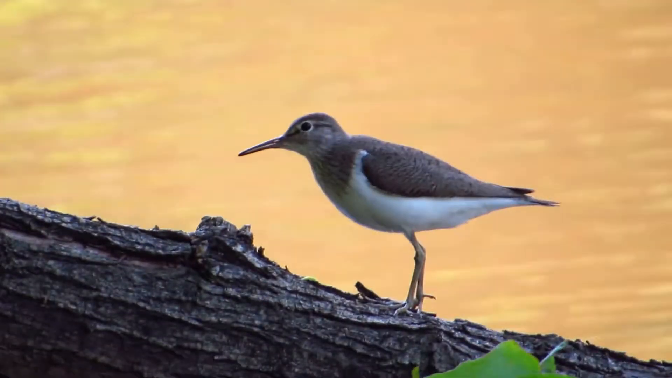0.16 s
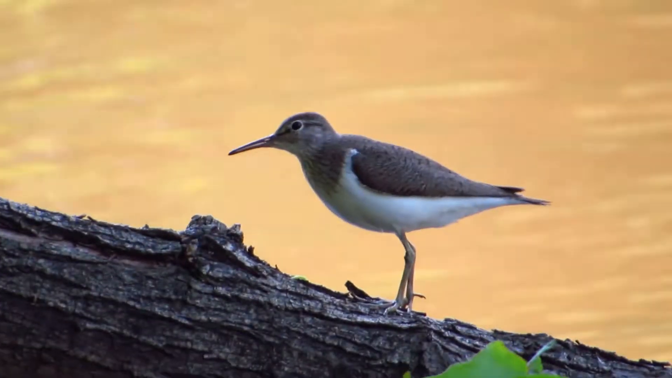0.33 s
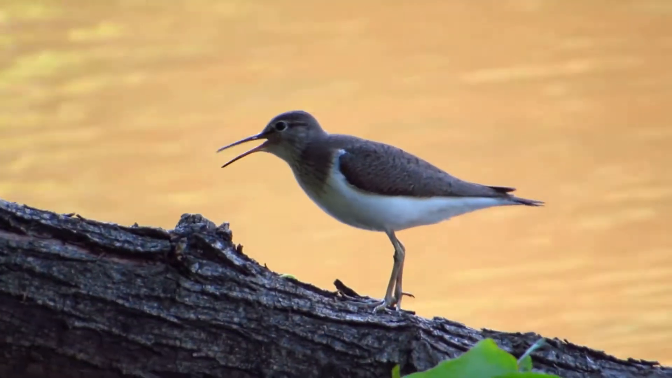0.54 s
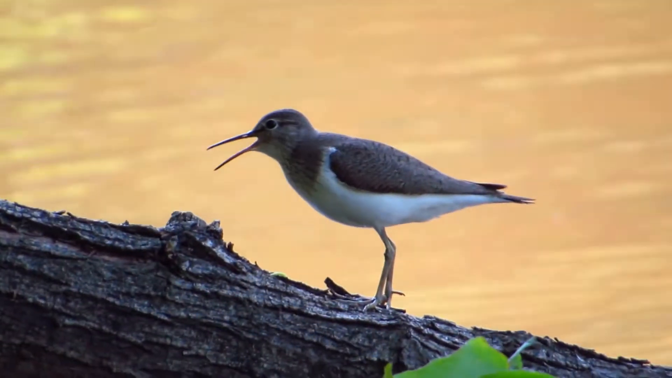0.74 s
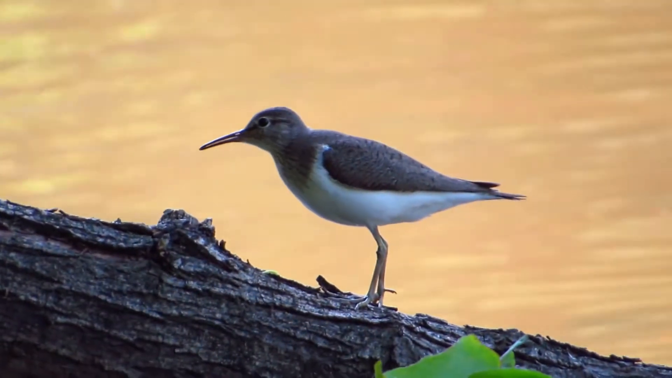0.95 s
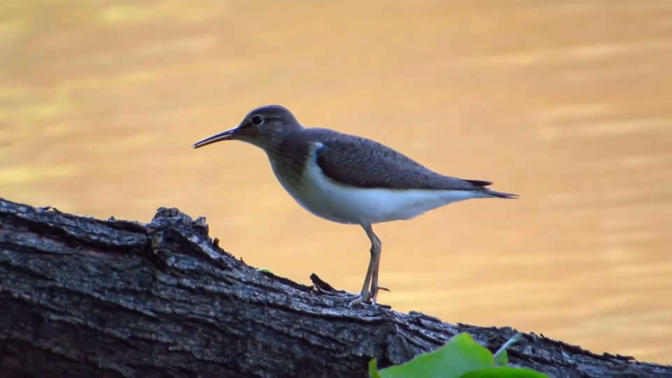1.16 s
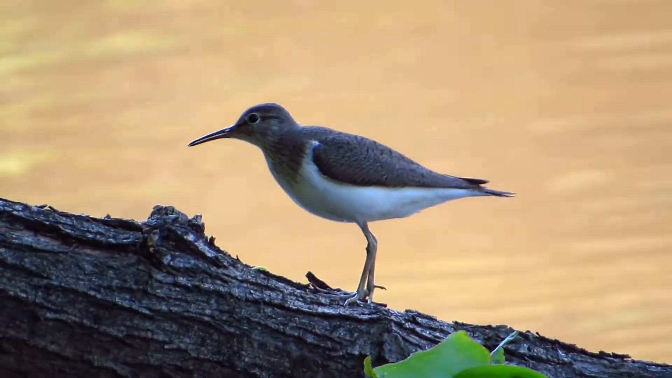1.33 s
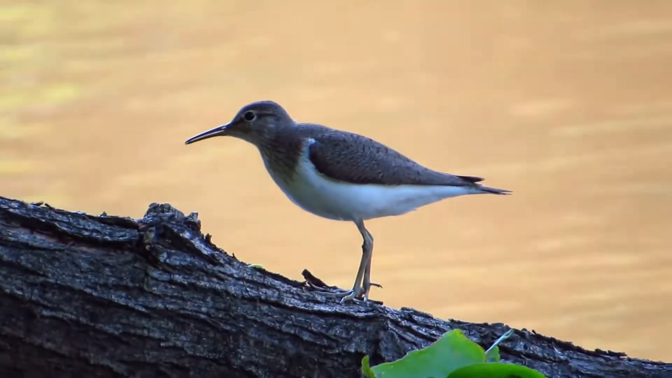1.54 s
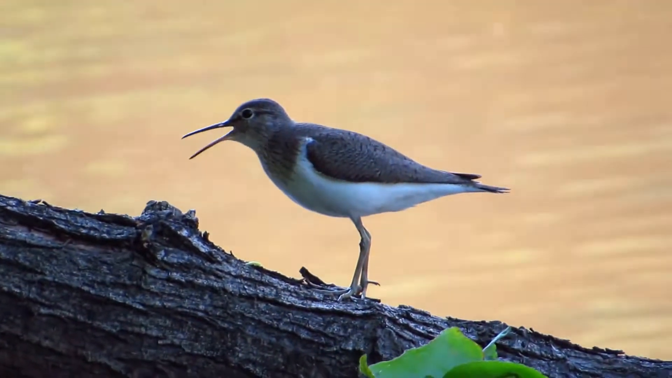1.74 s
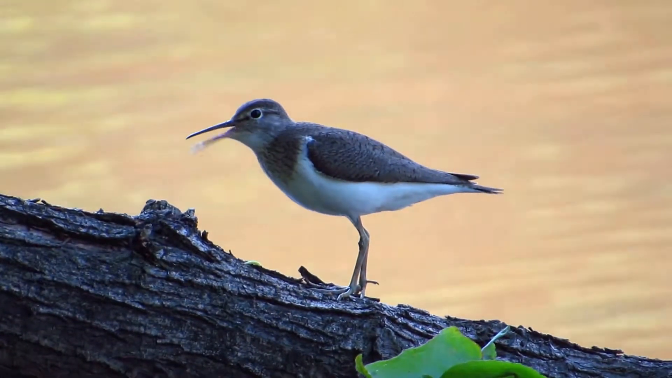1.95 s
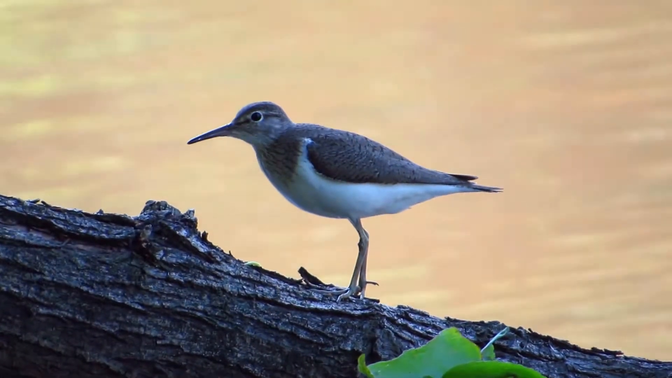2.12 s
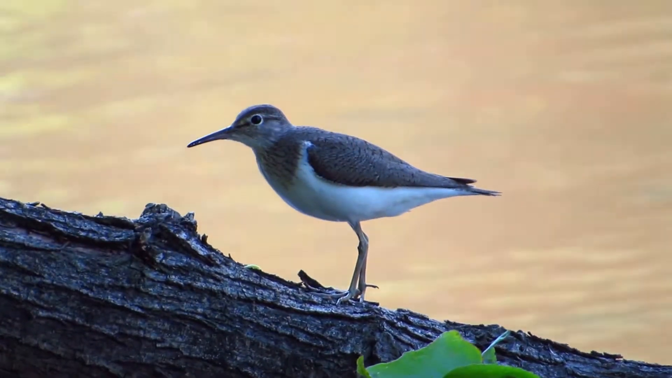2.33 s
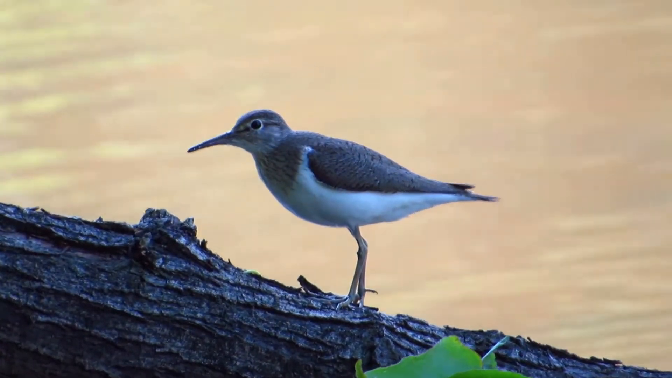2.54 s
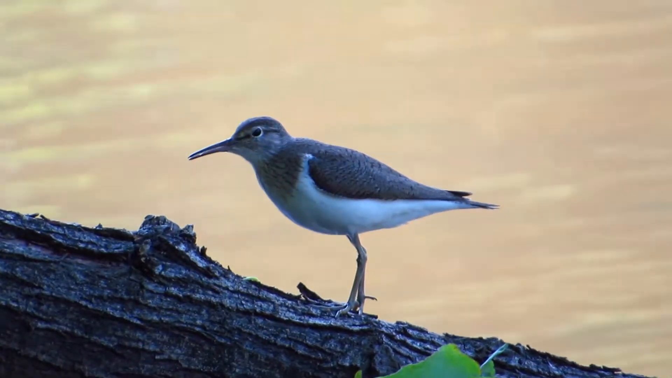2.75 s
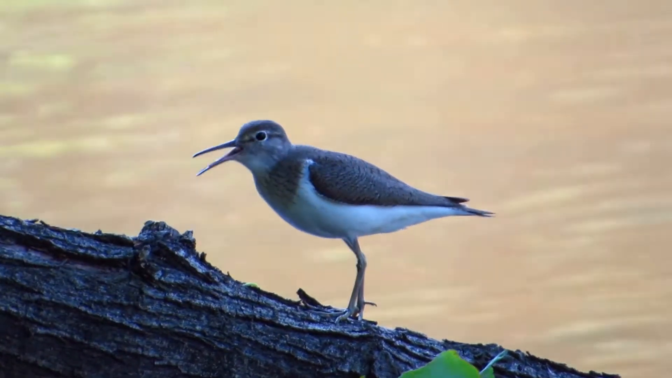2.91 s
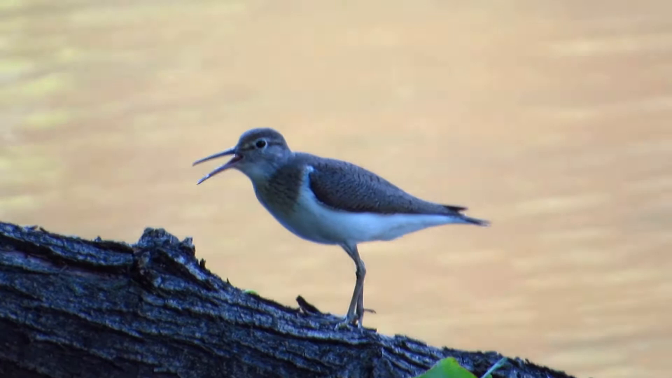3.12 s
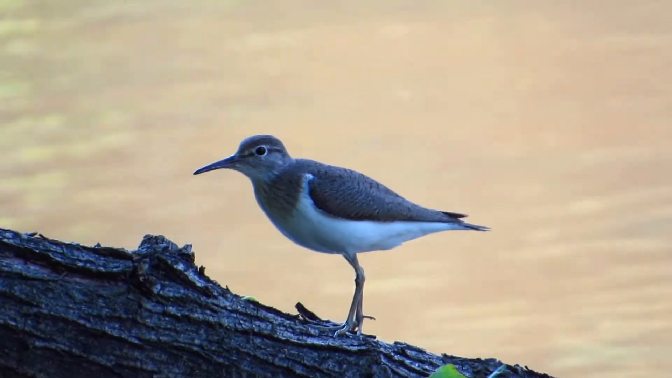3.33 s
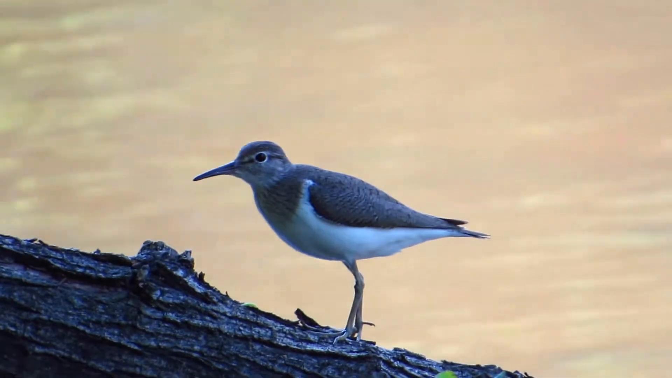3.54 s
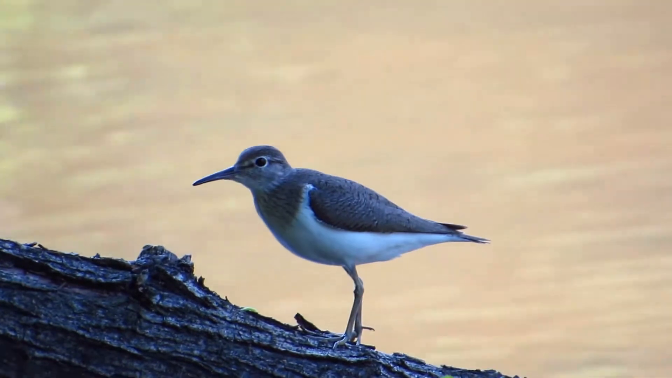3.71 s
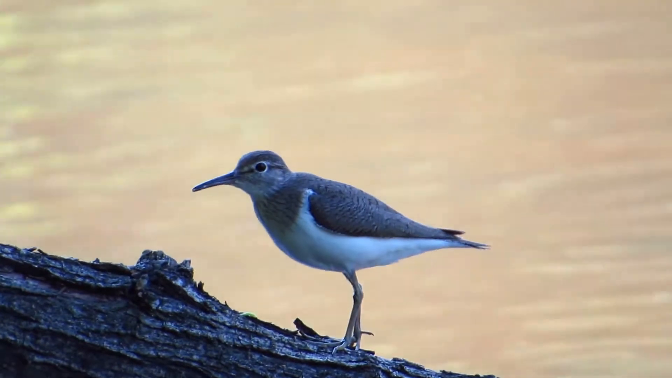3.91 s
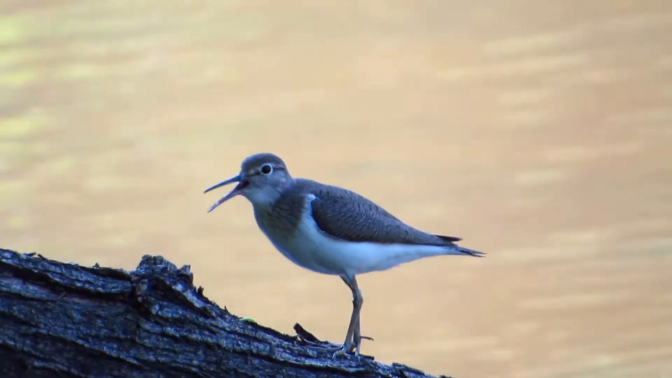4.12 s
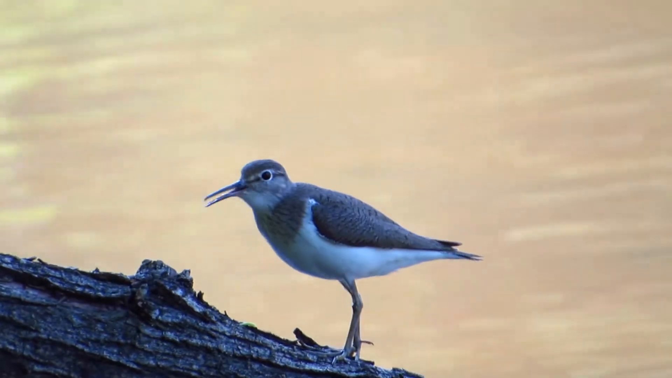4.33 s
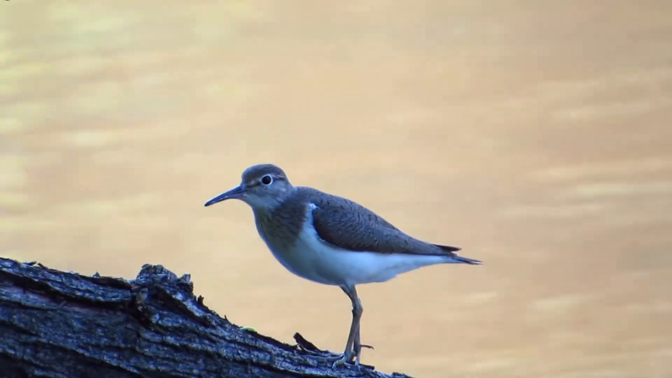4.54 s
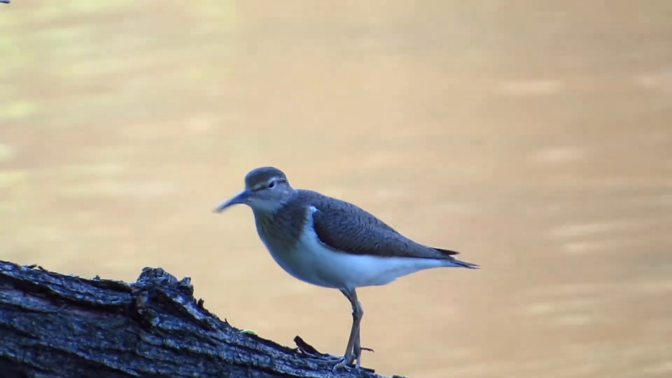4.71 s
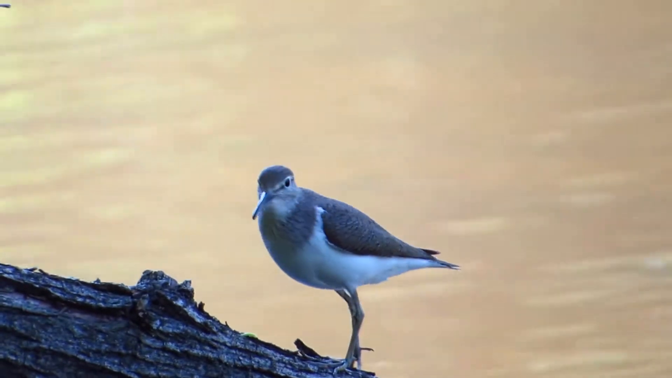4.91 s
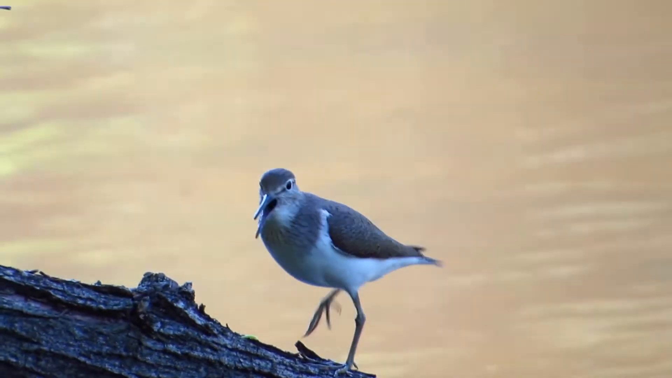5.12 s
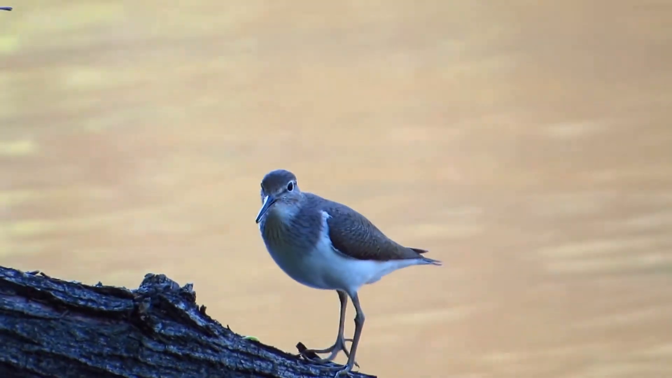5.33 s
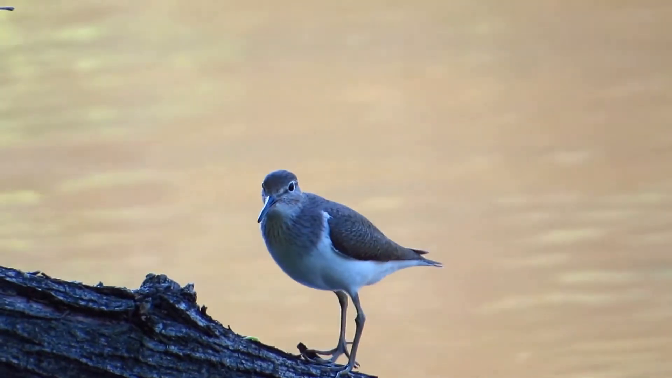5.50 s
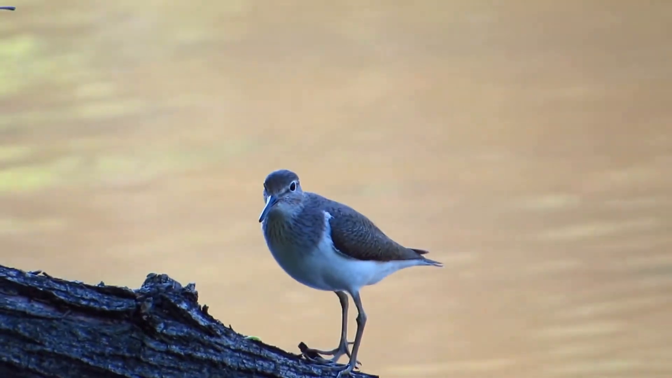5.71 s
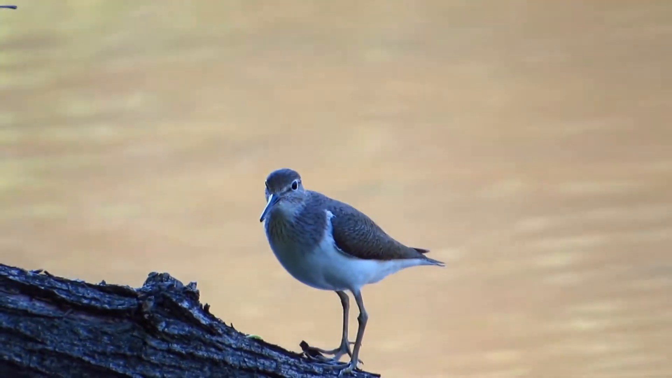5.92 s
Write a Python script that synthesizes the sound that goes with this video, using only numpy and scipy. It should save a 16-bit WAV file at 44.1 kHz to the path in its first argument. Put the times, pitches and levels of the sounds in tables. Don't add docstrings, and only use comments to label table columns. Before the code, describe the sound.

A sandpiper repeats piercing, near-pure rising whistles about once a second, ringing off riverbank trees over faint distant birdsong and low water haze.

```python
import sys
import numpy as np
from scipy import signal
from scipy.fft import rfft, irfft
from scipy.io import wavfile
from scipy.ndimage import uniform_filter1d

SR = 44100
rng = np.random.default_rng(int(sys.argv[2]) if len(sys.argv) > 2 else 0)


def unload_audio(sound):
    columns = np.transpose(np.atleast_2d(sound))
    steps = np.round(np.clip(columns, -1, 1) * 32767)
    wavfile.write(sys.argv[1], SR, steps.astype(np.int16))


def gain_from_db(level_db):
    decades = np.asarray(level_db, float) / 20
    return 10 ** decades


N = 267246

# start in seconds, length in seconds, held effort in dB,
# settled pitch in Hz, overtone offset in dB.
WHISTLES = [
    (-.55, .35, -24, 4740, 0),
    (0.505, .359, -25.5, 4735, 1),
    (1.645, .336, -22.5, 4745, 2),
    (2.813, .357, -20, 4705, -1),
    (4.0, .349, -20.5, 4705, -1),
    (4.991, .312, -20, 4715, 2),
]
# middle in seconds, half width in seconds, change in dB.
FALTERS = [
    (.62, .006, -9),
    (.835, .012, -4),
    (1.743, .006, -8),
    (1.825, .015, -3),
    (2.92, .04, -6),
    (5.025, .015, -9),
    (5.165, .014, -10),
]
# time in seconds, pitch in Hz, level in dB.
TWIG_SNAPS = [
    (0.311, 10650, -69),
    (1.035, 8100, -55),
    (1.449, 9360, -61),
    (1.725, 9040, -68),
    (5.863, 12500, -53.5),
]

# start in seconds,
# length in seconds, start pitch in Hz, end pitch in Hz, level in dB.
WARBLER_FLICKS = [(.11, .05, 4700, 4400, -64), (.375, .06, 5000, 4150, -62), (.425, .035, 6500, 5400, -60),
                  (.76, .04, 4600, 4150, -60), (1.06, .07, 6600, 4150, -59), (1.42, .05, 6400, 4700, -56),
                  (1.77, .08, 3700, 3350, -52), (2.1, .08, 7000, 3400, -52),
                  (2.445, .05, 6900, 4300, -59.5), (2.785, .045, 6900, 5400, -54),
                  (3.095, .04, 6800, 4200, -55), (3.452, .06, 6700, 4650, -53),
                  (5.305, .025, 7500, 6560, -58)]
THRUSH_NOTES = [(.25, .088, 1750, 1750, -58.5), (.355, .095, 2200, 1900, -57), (.71, .04, 2200, 2350, -56),
                (.765, .078, 1900, 2296, -53), (.8, .08, 1780, 1780, -59), (.87, .073, 2300, 2000, -54),
                (.92, .1, 3120, 2940, -56), (1.02, .06, 3000, 2700, -56), (1.57, .053, 2100, 1950, -49),
                (1.765, .2, 2020, 1965, -50), (.96, .18, 2250, 2150, -57), (5.56, .065, 2070, 2060, -56.5),
                (5.64, .02, 2400, 2150, -51), (5.72, .084, 2060, 2055, -48), (5.82, .18, 4140, 4500, -62),
                (6.03, .06, 1756, 1650, -58)]
ALARM_NOTES = [
    (1.74, .49, 9310, 7950, -57.5),
    (5.67, .38, 9090, 8030, -52),
]
WATER_PLOPS = [
    (2.955, .025, 730, 743, -45),
    (3.04, .029, 712, 720, -50),
    (3.04, .018, 855, 866, -48.5),
]

# start in seconds, level in dB.
CHIP_SHAPE = (.045, 5300, 4150, -10)
CHIP_TIMES = [(1.39, -55), (1.495, -52), (1.6, -54), (2.04, -52), (2.145, -53), (2.245, -53), (2.335, -54),
              (2.44, -54), (2.54, -60), (2.645, -54), (2.745, -56)]
LEVEL_SHAPE = (.09, 3780, 3370, 0)
LEVEL_TIMES = [(2.36, -48), (2.455, -47.5), (2.555, -50.5), (2.655, -50), (2.76, -50.5), (4.22, -53)]
FALL_SHAPE = (.055, 3750, 2480, -4)
FALL_TIMES = [(2.84, -47), (2.93, -48), (3.0, -47.5), (3.09, -49), (3.175, -45.5), (3.36, -46.5),
              (4.31, -50), (5.92, -53)]
DROP_SHAPE = (.055, 2550, 1900, -3)
DROP_TIMES = [(3.42, -49.5), (4.35, -52)]
RISE_SHAPE = (.066, 1880, 3350, -4)
RISE_TIMES = [(3.595, -49), (3.74, -49), (3.885, -50.5)]

# middle in seconds, half width in seconds, level in dB.
CHORUS_WAVES = [
    (2.8, .75, -56),
    (5.0, .7, -62),
]
# frequency in Hz, density in dB per Hz.
HAZE_SPECTRUM = [(15, -27), (25, -13), (65, 3.5), (130, -7.5), (300, -2), (560, -4.5), (700, 0.5),
                 (900, -1.5), (1100, -7.5), (1600, -10.5), (2600, -13.5), (5200, -16.5), (13600, -33.5),
                 (15300, -56)]
# frequency in Hz, correlation from -1 to 1.
HAZE_LIKENESS = [(60, 0), (130, -0.9), (290, -0.57), (640, 0.01), (1400, 0.12), (3080, 0.6), (6770, 0.2),
                 (14900, -0.1)]
# frequency in Hz, left minus right in dB.
HAZE_BALANCE = [(60, 1), (130, 0.5), (290, -0.5), (640, -3.5), (1400, 0), (3080, 2), (6770, 0),
                (14900, 0.5)]
# frequency in Hz, width in Hz, depth in dB.
MOTOR_NOTCHES = [(3960, 130, -13), (7940, 110, -11)]

SWOOP_BELOW_HZ, SETTLE_S, CLIMB_HZ_PER_S = 540, .052, 200
SOFT_DB, OPEN_S, SWELL_DB, SWELL_S, PUSH_DB, PUSH_S = -11, .012, -19, .09, 3, .015
SECOND_DB, THIRD_DB = -24, -30
LOW_PAN_DB, HELD_PAN_DB, SWAY_DB = -7, 1, 1.8
LEAVES_DB, LEAVES_HZ = 3, 70
BILL_HZ, BILL_DB = 8500, -37
FLICK_PAN_DB, ALARM_PAN_DB, PLOP_PAN_DB = 2, -1.5, -15
HAZE_DB, HUSH_DB, HUSH_S = -47, -5, .4


def sandpiper():
    out = np.zeros((2, N + SR))
    leaves = gain_from_db(LEAVES_DB * np.array([wobble(2 * SR, LEAVES_HZ) for _ in range(2)]))
    for row in WHISTLES:
        s, sound, sideways = whistle(*row)
        back = echoes(sideways, -14, .4, -14, .9)
        add(out, s, sound)
        add(out, s, (.9 * back + .35 * back[::-1]) * leaves[:, :back.shape[1]])
    return out


def whistle(s, length_s, held_db, top_hz, bright_db):
    t = np.arange(0, length_s + .005, 1 / SR)
    left_s = t[-1] - t
    low = np.exp(-t / SETTLE_S)
    hz = top_hz - SWOOP_BELOW_HZ * low + CLIMB_HZ_PER_S * t - 350 * np.exp(-left_s / .0035)
    phase = 2 * np.pi * np.cumsum(hz + 4 * wobble(len(t), 150)) / SR
    phase = phase - np.array([[0], [.5]])

    flicker_db = (.8 + 2.5 * np.exp(-t / .1)) * wobble(len(t), 120)
    tone = np.sin(phase) * gain_from_db(flicker_db)

    beams_db = 3.5 * np.array([wobble(len(t), 110) for _ in range(4)]) - 25 * np.exp(-left_s / .004)
    second_db = SECOND_DB + bright_db + 6 * (t / length_s - .6) + beams_db[:2] + [[-1.5], [1.5]]
    third_db = THIRD_DB + bright_db - 8 * (t / length_s - .5) + beams_db[2:] + [[1.5], [-1.5]]
    tone += gain_from_db(second_db) * np.sin(2 * phase)
    tone += gain_from_db(third_db) * np.sin(3 * phase[0] - [[0], [1.4]])

    edges = np.minimum(t / .004, 1) * np.minimum(left_s / .007, 1)
    effort_db = held_db + SOFT_DB * np.exp(-t / OPEN_S) + SWELL_DB * np.exp(-t / SWELL_S)
    effort_db += PUSH_DB * np.exp(-left_s / PUSH_S)
    effort_db += sum(db * np.exp(-((s + t - at) / half) ** 2) for at, half, db in FALTERS)
    pan_db = HELD_PAN_DB + (LOW_PAN_DB - HELD_PAN_DB) * low + SWAY_DB * wobble(len(t), 40)
    sound = panned(np.sqrt(2) * gain_from_db(effort_db) * edges * tone, pan_db)

    sideways_db = 7 * np.exp(-t / .1) + 7 * np.exp(-left_s / .006)
    return s, sound, sound * gain_from_db(sideways_db)


def snaps():
    out = np.zeros((2, N + SR))
    t = np.arange(200) / SR
    bill = [(s + length_s, BILL_HZ, db + BILL_DB) for s, length_s, db, *_ in WHISTLES]
    for s, hz, db in [*TWIG_SNAPS, *bill]:
        puff = uniform_filter1d(rng.standard_normal((2, len(t))), size=5)
        add(out, s, gain_from_db(db + 17.5) * puff * np.exp(-t / .0012) * np.sin(2 * np.pi * hz * t))
    return out


def far_sources():
    direct, thrown = np.zeros((2, 2, N + SR))
    finch = sung(CHIP_SHAPE, CHIP_TIMES) + sung(FALL_SHAPE, FALL_TIMES) + sung(DROP_SHAPE, DROP_TIMES)
    # notes, settling share, buzz in Hz, soft-edge share, direct level in dB.
    voices = [
        (finch, 1.2, 260, .3, -11),
        (sung(LEVEL_SHAPE, LEVEL_TIMES), .2, 90, .3, -5),
        (placed(WARBLER_FLICKS, FLICK_PAN_DB), .18, 30, .2, -1),
        (placed(THRUSH_NOTES, 0), .8, 20, .6, -5),
        (sung(RISE_SHAPE, RISE_TIMES), .7, 45, .15, -4),
        (placed(ALARM_NOTES, ALARM_PAN_DB), .24, 25, .5, 1.5),
        (placed(WATER_PLOPS, PLOP_PAN_DB), .8, 5, .7, 3),
        (chorus_notes(), .7, 60, .6, -5),
    ]
    for rows, *voice, direct_db in voices:
        for row in rows:
            s, sound = note(*row, *voice)
            add(direct, s, gain_from_db(direct_db) * sound)
            add(thrown, s, sound)
    back = echoes(thrown, -2, .35, -6.5, 1.2)[:, :N + SR]
    return direct + back + .3 * back[::-1]


def note(s, length_s, start_hz, end_hz, db, pan_db, settle, buzz_hz, edge):
    t = np.arange(0, length_s, 1 / SR)
    glide = np.exp(-t / (settle * length_s))
    glide = (glide - glide[-1]) / (1 - glide[-1])
    hz = end_hz + (start_hz - end_hz) * glide + buzz_hz * wobble(len(t), 300)
    shape = signal.windows.tukey(len(t), np.clip(edge, 0, 1))
    tone = np.sin(2 * np.pi * np.cumsum(hz) / SR)
    return s, panned(np.sqrt(2) * gain_from_db(db) * shape * tone, np.array(pan_db))


def sung(shape, rows):
    length_s, start_hz, end_hz, pan_db = shape
    return [(s, length_s, start_hz, end_hz, db, pan_db) for s, db in rows]


def placed(rows, pan_db):
    return [(*row, pan_db) for row in rows]


def chorus_notes():
    s, length, pitch, glide, size, side = rng.random((260, 6)).T
    s = s * N / SR
    hz = 2900 + 800 * pitch
    waves_db = [top_db - 9 * ((s - middle) / half) ** 2 for middle, half, top_db in CHORUS_WAVES]
    db = np.max(waves_db, axis=0) + 6 * (size - .5)
    return np.transpose([s, .03 + .06 * length, hz + 500 * (glide - .4), hz, db, 8 * (side - .5)])


def haze():
    frames, hz = N // 256 + 5, np.fft.rfftfreq(1024, 1 / SR)
    a, b, c, d, patches = rng.standard_normal((frames, 513, 5)).T
    patches = uniform_filter1d(uniform_filter1d(patches, 12, 0), 12, 1)
    same = np.clip(read(HAZE_LIKENESS, hz), -1, 1)[:, None]
    left = a + 1j * b
    right = same * left + np.sqrt(1 - same ** 2) * (c + 1j * d)
    z = np.array([left, right])
    z *= gain_from_db(np.array([.5, -.5])[:, None, None] * read(HAZE_BALANCE, hz)[:, None])
    z *= gain_from_db(read(HAZE_SPECTRUM, hz)[:, None] + patches / np.std(patches)) / np.sqrt(1.01 + same)
    x = signal.istft(z, nperseg=1024, noverlap=768)[1][:, :N]
    band_filter = signal.butter(4, [100, 1500], "bandpass", fs=SR, output="sos")
    band = signal.sosfilt(band_filter, x.mean(0))
    hush_db = HUSH_DB * np.exp(-np.arange(N) / SR / HUSH_S)
    return x / np.std(band) * gain_from_db(HAZE_DB + hush_db)


def echoes(x, early_db, early_t60, late_db, late_t60):
    taps, t = np.zeros((2, SR)), np.arange(SR) / SR
    slots = np.arange(80, SR - 40, 40)
    at = slots + rng.integers(0, 40, (2, len(slots)))
    np.put_along_axis(taps, at, rng.choice([-1., 1.], at.shape), 1)
    taps *= gain_from_db(1.2 * wobble(SR, 20))
    dull = signal.sosfilt(signal.butter(4, 7000, fs=SR, output="sos"), taps)
    taps = dull + (taps - dull) * gain_from_db(4 - 80 * t)
    tail = 0
    for db, t60 in ((early_db, early_t60), (late_db, late_t60)):
        decay = taps * gain_from_db(-60 * t / t60)
        tail = tail + gain_from_db(db) * decay / np.linalg.norm(decay, axis=1, keepdims=True)
    return signal.fftconvolve(x.mean(0)[None], tail, axes=1)


def wobble(size, hz):
    x = rng.standard_normal(max(size, 24000))[:size]
    x = uniform_filter1d(uniform_filter1d(x, int(SR / hz)), int(SR / hz))
    return x / np.std(x)


def panned(x, pan_db):
    return x * gain_from_db(np.array([pan_db / 2, -pan_db / 2])).reshape(2, -1)


def add(mix, s, sound):
    part = mix[:, round((s + 1) * SR):][:, :sound.shape[1]]
    part += sound[:, :part.shape[1]]


def read(points, hz):
    f, value = np.transpose(points)
    return np.interp(np.log(hz + 1), np.log(f + 1), value)


def scene():
    return (sandpiper() + far_sources() + snaps())[:, SR:] + haze()


def gapped(x):
    hz, t, z = signal.stft(x, SR, nperseg=1024)
    whistle_bins = (hz > 4200) & (hz < 5100)
    tone_db = 10 * np.log10((abs(z[:, whistle_bins]) ** 2).sum((0, 1)) + 1e-12)
    band = (hz // 345).astype(int)
    whim_db = 3.5 * rng.standard_normal((len(t), band.max() + 1)).T[band]
    limit_db = -26.5 + 5 * (hz - 5200) / 1000
    above = (hz > 5180) & (hz < 6900)
    empty = (tone_db + whim_db > limit_db[:, None]) & above[:, None]
    return signal.istft(z * ~empty, SR, nperseg=1024)[1][:, :N]


def roll_off(x):
    return signal.sosfilt(signal.butter(12, 15470, fs=SR, output="sos"), x)


def record(dry):
    hz = np.fft.rfftfreq(N, 1 / SR)
    dip_db = sum(db / (1 + (2 * (hz - f) / width) ** 2) for f, width, db in MOTOR_NOTCHES)
    notched = irfft(rfft(dry) * gain_from_db(dip_db), N)
    return roll_off(gapped(notched))


dry = scene()
out = record(dry)
unload_audio(out)
```